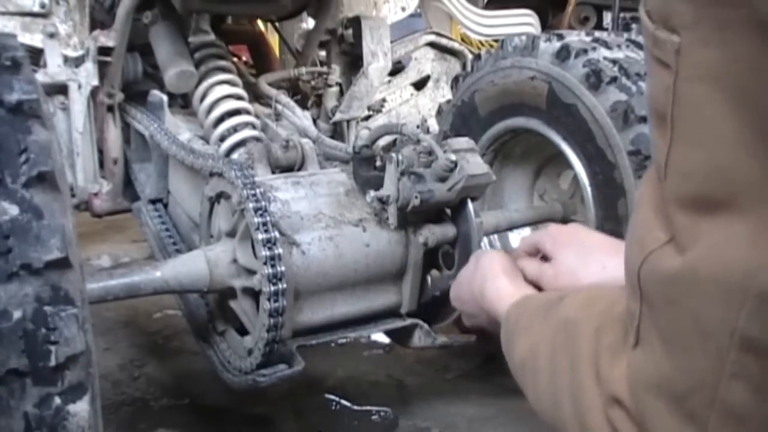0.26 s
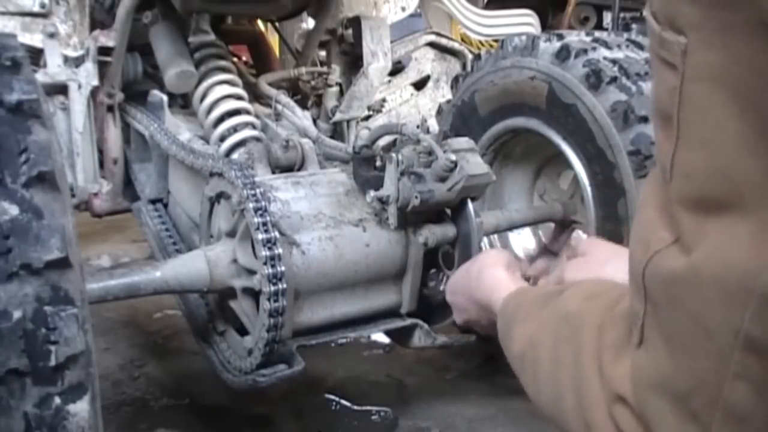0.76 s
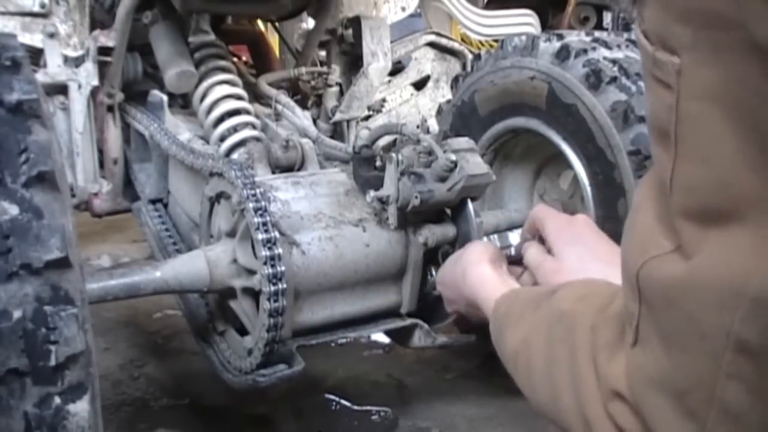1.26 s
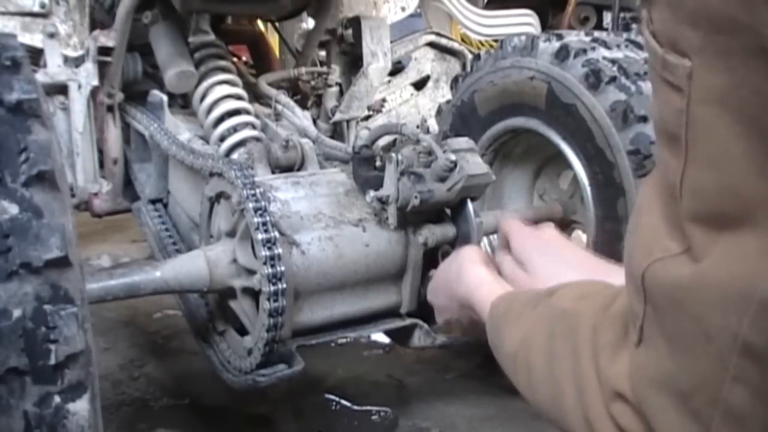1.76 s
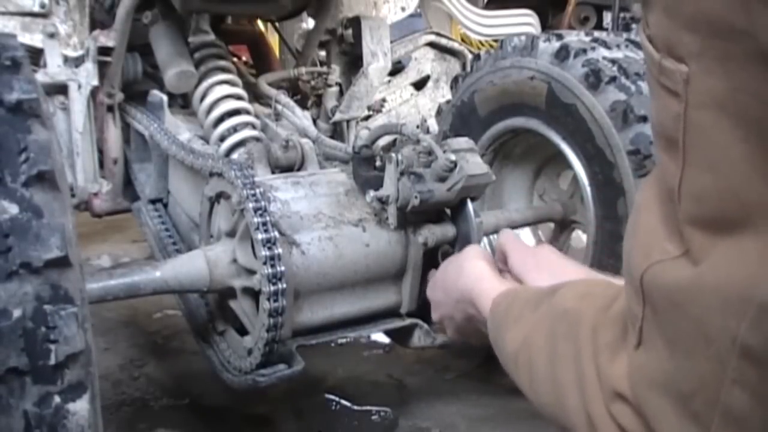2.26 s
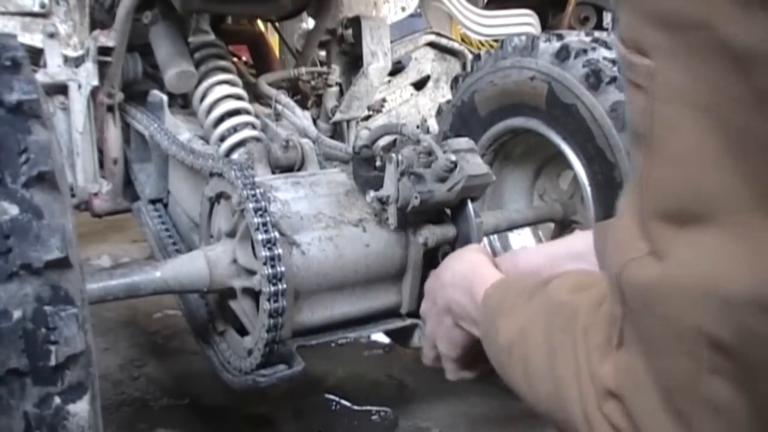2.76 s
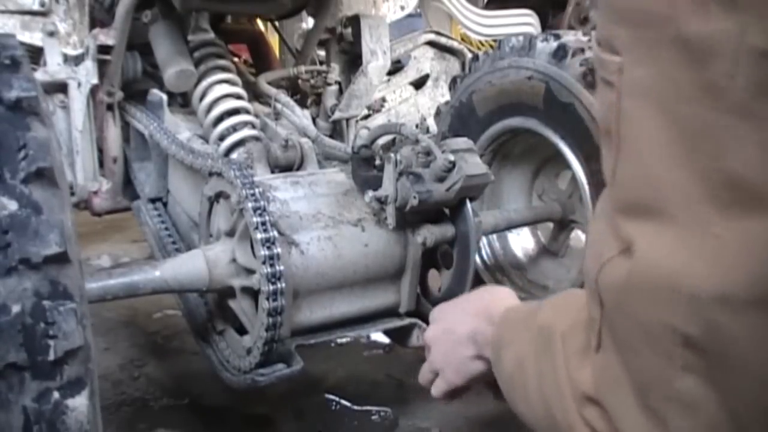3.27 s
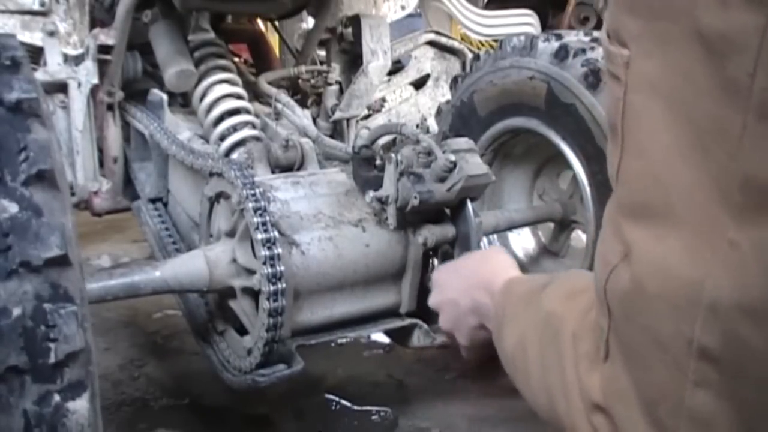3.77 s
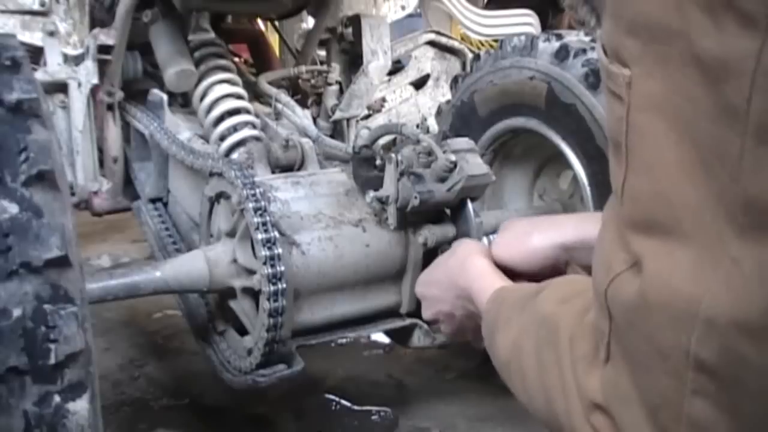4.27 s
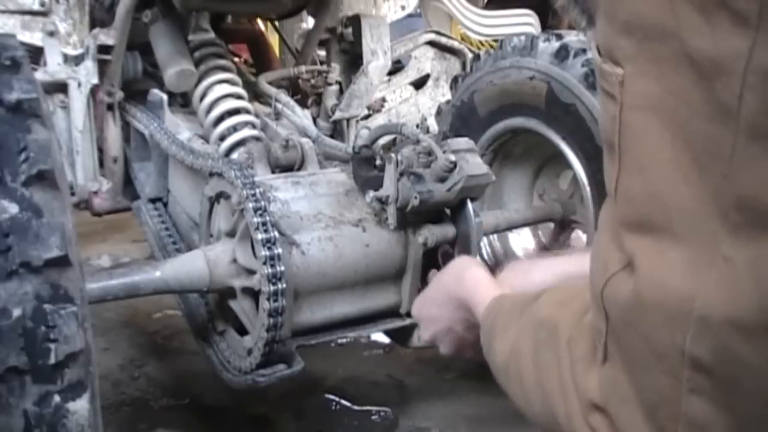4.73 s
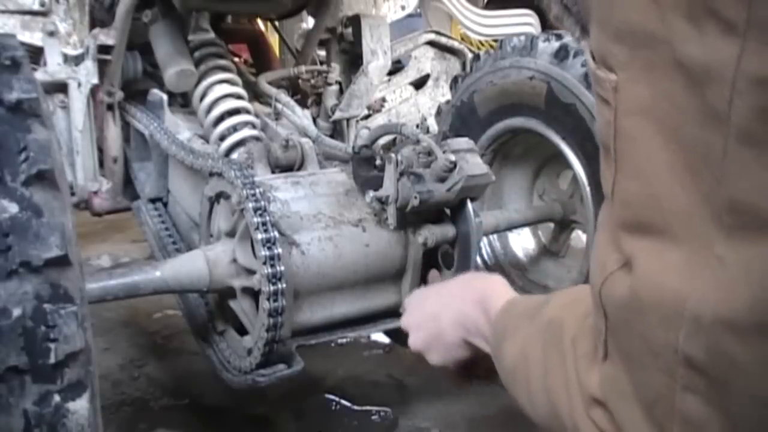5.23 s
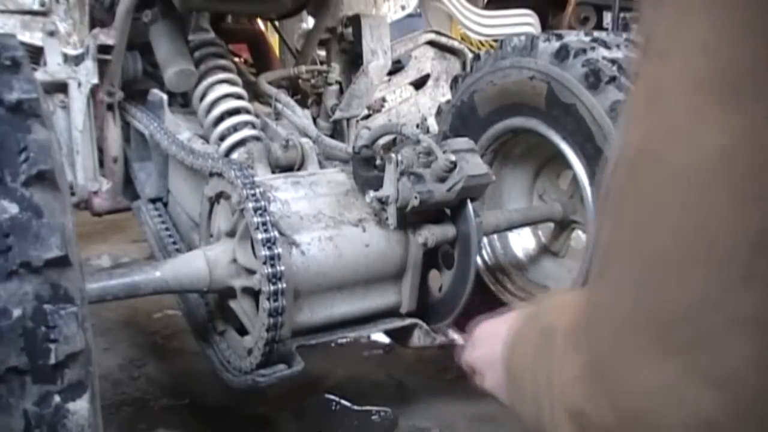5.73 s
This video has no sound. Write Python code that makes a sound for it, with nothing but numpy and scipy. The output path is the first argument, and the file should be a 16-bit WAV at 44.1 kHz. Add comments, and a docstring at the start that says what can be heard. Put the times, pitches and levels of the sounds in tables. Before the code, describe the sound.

A nut is unscrewed by hand from a quad bike's axle. The loose hub gives short, uneven metal knocks, the nut clinks once, and the threads tick and scrape. Midway, something bumps on the floor and a washer jingles lightly. More scrapes and knocks follow, then a tool clacks and heavy overalls rustle. The small workshop adds a short reverberation, with faint hiss and hum underneath.

```python
"""Sleeves rustle over a faint hum and hiss, then a loose hub knocks on its splines: someone is spinning
a nut off the rear axle of a quad bike by hand, in a small workshop. The threads tick and scrape by
stick-slip friction, and small steel parts clink in their free modes. Things bump on the floor and a
tool clacks as the hand takes it. A short reverberation follows every blow."""
import sys
import numpy as np
from scipy import signal
from scipy.fft import rfft, irfft
from scipy.io import wavfile

SR = 44100
rng = np.random.default_rng(int(sys.argv[2]) if len(sys.argv) > 2 else 0)


def file_out(sig):
    """Save sig as 16-bit WAV at sys.argv[1]."""
    # one column per channel
    cols = np.atleast_2d(sig).T
    # limit, then scale
    lim = np.clip(cols, -1, 1)
    pcm = np.round(lim * 32767).astype(np.int16)
    wavfile.write(sys.argv[1], SR, pcm)


N = 264600
T = np.arange(N) / SR
AGE = T[:SR * 3 // 4]  # seconds since a contact began


def undb(db):
    """Decibels to amplitude ratio."""
    return 10 ** (np.asarray(db) / 20)


def unit(x):
    """Scale to rms 1."""
    return x / np.sqrt(np.mean(x ** 2))


def unit_blow(x):
    """Scale a blow to rms 1 over its first 5 ms."""
    return x / np.sqrt(np.mean(x[:SR // 200] ** 2))


def at_hz(points, hz):
    """Interpolate a spectrum on a log-frequency axis."""
    f, value = np.transpose(points)
    return np.interp(np.log(np.maximum(hz, 1)), np.log(f), value)


def coloured(points, size):
    """Filtered noise of rms 1; the points give its relative spectral density."""
    gain = undb(at_hz(points, np.fft.rfftfreq(size, 1 / SR)))
    return unit(irfft(rfft(rng.standard_normal(size)) * gain, size))


def walk(rate_hz, size):
    """Smooth random modulation with spread near 1."""
    knots = rng.standard_normal(size)
    return np.interp(np.arange(size) * rate_hz / SR, np.arange(size), knots)


def shelf(x, db, edge_hz):
    """A shelving filter lifts or lowers everything under the edge."""
    hz = np.fft.rfftfreq(len(x), 1 / SR)
    return irfft(rfft(x) * undb(db / (1 + (hz / edge_hz) ** 6)), len(x))


def add(out, start_s, x):
    """Superpose a sound from start_s on."""
    i = max(int(start_s * SR), 0)
    out[i:i + len(x)] += x[:N - i]


def swells(rows, rest_db):
    """An envelope of smooth arches, one a row, summed in power with a resting level."""
    power = undb(rest_db) ** 2
    for middle_s, length_s, level_db in rows:
        arch = np.cos(np.pi * np.clip((T - middle_s) / length_s, -.5, .5)) ** 2
        power = power + (undb(level_db) * arch) ** 2
    return np.sqrt(power)


def clothes():
    """Friction noise: fibres catch and let go as the fingers work and the body shifts."""
    # friction spectra of fingers and overalls: frequency_hz, level_db
    finger_spectrum = [(100, -41), (250, -23.5), (900, -28), (1600, -2), (2600, -5.5), (4800, -8.5),
                       (7000, -2), (10000, 2), (12500, -1), (14000, -1.5)]
    overall_spectrum = [(45, -37), (80, -27), (110, 0), (163, -8), (220, -8), (414, -10.5), (800, 0.5),
                        (1320, 0.5), (2780, -7), (5000, -10), (9000, -19)]
    # fingers rub cloth and steel, the body shifts in heavy overalls: middle_s, length_s, level_db
    rubs = [(0.02, 0.12, -54.5), (0.6, 0.45, -55), (2.07, 0.16, -47), (2.66, 0.63, -44.5),
            (2.97, 0.56, -44.5), (3.32, 0.44, -44.5), (3.66, 0.52, -49.5), (4.37, 0.4, -51),
            (5.08, 0.28, -45.5), (5.33, 0.54, -51), (5.95, 0.6, -36)]
    shifts = [(2.9, 0.26, -51), (3.65, 0.19, -50), (4.5, 2.35, -56.5), (5.22, 1.1, -56.5),
              (5.54, 0.077, -48), (5.75, 0.62, -50.5), (5.94, 0.28, -37.5)]
    fingers = coloured(finger_spectrum, N) * unit(undb(1.7 * walk(700, N) + 0.22 * walk(35, N)))
    overalls = coloured(overall_spectrum, N) * unit(undb(3.9 * walk(320, N) + 1.6 * walk(40, N)))
    return fingers * swells(rubs, rest_db=-61.5) + overalls * swells(shifts, rest_db=-68.5)


def background():
    """Ambient noise: steady hiss and rumble, with a hum that wavers in phase and amplitude."""
    # hiss of the workshop air: frequency_hz, level_db
    air = [(15, -28), (25, -15), (101, 0), (211, 4), (452, 2), (604, 2), (874, 1.5), (1140, -2.5),
           (1560, -4.5), (2200, -10.5), (3350, -10), (5370, -12.5), (9100, -9.5), (11800, -9), (13500, -26)]
    # the hum swells and sinks: middle_s, length_s, level_db
    hum_swells = [(0.5, 1, -60), (2.0, 0.56, -61), (5.95, 0.9, -63.5)]
    tone = np.sqrt(2) * np.sin(2 * np.pi * 119 * T + 2.6 * walk(9.5, N))
    hum = tone * undb(2.3 * walk(20, N)) * swells(hum_swells, rest_db=-72)
    rumble = coloured([(25, -22), (55, -14), (74, 5.0), (88, -1), (102, -19), (150, -7),
                       (400, -33), (2000, -30)], N)
    return undb(-54.5) * coloured(air, N) + hum + undb(-73) * rumble


def onset(rise_s):
    """A contact builds up over a finite time while the faces settle on each other."""
    return 1 - np.exp(-AGE / rise_s)


def crack(decay_s):
    """A brief impact has a broad spectrum: a burst of noise where two hard faces meet."""
    # contact noise: frequency_hz, level_db
    contact = [(50, -49), (150, -5), (300, 0), (700, -3), (1500, -1), (3500, -2), (5000, -6), (6500, -2),
               (9000, -2.5), (13500, -9.5)]
    return unit_blow(coloured(contact, len(AGE)) * np.exp(-AGE / decay_s) * onset(0.00032))


def chatter(bouts, count=8):
    """Repeated impact: a dangling part touches unevenly, ever more lightly. Gives start_s, level_db."""
    gap_s, jitter, scatter_db, fade_db_per_s = 0.034, 0.25, 1.5, 25
    touches, steps = [], np.arange(count)
    for start_s, length_s, level_db in bouts:
        slip, scatter = rng.standard_normal((count, 2)).T
        ages = gap_s * (steps + jitter * slip * (steps > 0))
        levels = level_db + scatter_db * scatter - fade_db_per_s * ages
        touches += [(start_s + age, db) for age, db in zip(ages, levels) if age < length_s]
    return touches


def chimes(touches, modes, tick_db, tick_s):
    """Mode splitting: a small free steel part is not quite round, so each of its modes beats."""
    out = np.zeros(N)
    hz, db, t60 = np.transpose(modes)[:, :, None]
    for start_s, level_db in touches:
        phase, split = rng.random((2, len(modes), 1))
        beat = 1 + .5 * np.cos(2 * np.pi * 45 * split * AGE)
        decay = np.exp(-np.log(1000) * AGE / t60)
        ring = undb(db) * beat * decay * np.sin(2 * np.pi * (hz * AGE + phase))
        add(out, start_s, undb(level_db) * (unit_blow(ring.sum(axis=0)) + undb(tick_db) * crack(tick_s)))
    # so small a part radiates only treble
    return signal.sosfilt(signal.butter(2, 600, "high", fs=SR, output="sos"), out)


def nut_brushes():
    """Light repeated contact with the axle excites a few high, short-lived modes of the nut."""
    # bouts of brushing: start_s, length_s, level_db
    bouts = [(0.125, 0.02, -52), (0.572, 0.09, -50.5), (1.09, 0.07, -45.5)]
    # modes of the brushed nut: pitch_hz, level_db, t60_s
    modes = [(6420, -4, .09), (9400, -7, .08), (11500, -3, .09), (12650, -2, .08)]
    return chimes(chatter(bouts), modes, tick_db=-2, tick_s=0.016)


def contact_colour(hz, hardness_db, spot_hz, lift_db):
    """Modal excitation in dB: soft contact favours low modes, the struck spot those near one pitch."""
    softness_db = -hardness_db / (1 + (hz / 2000) ** 6)
    return softness_db + lift_db * np.exp(-(np.log2(hz / spot_hz) / .35) ** 2)


def blows(hits, modes, crowd, crowd_db, damp_s, ring_db, ring_s, lift_db, tick_db, tick_s, rise_s):
    """Damped vibration: a held part's modes lose most energy at once, then ring on faintly."""
    out = np.zeros(N)
    hz, width, db = np.transpose(modes)[:, :, None]
    grid_hz = np.geomspace(100, 9000, 60)
    tail = undb(ring_db) * np.exp(-AGE / ring_s)
    fade = np.exp(-AGE / damp_s - np.pi * width * AGE) + tail
    for start_s, level_db, hardness_db, spot_hz in hits:
        touch = (hardness_db, spot_hz, lift_db)
        detune, phase = rng.standard_normal((2, len(modes), 1))
        gain = undb(db + contact_colour(hz, *touch)) * np.sqrt(width)
        tones = np.sin(2 * np.pi * (hz * (1 + 0.0046 * detune) * AGE + phase))
        strong = (gain * fade * tones).sum(axis=0)
        # the crowd of weaker modes overlaps into noise
        spectrum = np.column_stack([grid_hz, at_hz(crowd, grid_hz) + contact_colour(grid_hz, *touch)])
        weak = coloured(spectrum, len(AGE)) * (np.exp(-AGE / (0.7 * damp_s)) + tail)
        body = unit_blow((unit(strong) + undb(crowd_db) * unit(weak)) * onset(rise_s))
        tick = undb(tick_db + 0.16 * hardness_db) * crack(tick_s)  # harder contacts tick more
        add(out, start_s, undb(level_db) * (body + tick))
    # parts this small radiate no bass
    return signal.sosfilt(signal.butter(6, 235, "high", fs=SR, output="sos"), out)


def hub_knocks():
    """Impact excitation: the loose hub strikes the axle's splines and sounds its damped modes."""
    # knocks: start_s, level_db, hardness_db, spot_pitch_hz
    hits = [(0.136, -43.5, -15, 740), (0.299, -15, -7.5, 1420), (0.342, -29.5, 9, 2200),
            (0.499, -35, -7, 1820), (1.075, -32, -15.5, 760), (1.118, -27.5, -19, 1070),
            (1.141, -26, -26, 1430), (1.506, -18.5, -11, 1510), (1.538, -28, -2, 2430),
            (1.79, -37.5, -15, 895), (2.106, -29, -20.5, 1500), (2.237, -30, -14, 1020),
            (2.358, -12, 0.5, 1540), (4.281, -23.5, -9.5, 3130), (4.706, -25, -17.5, 700)]
    # hub resonances: pitch_hz, width_hz, level_db
    modes = [(300, 20, -11.5), (651, 56, -2), (735, 32, 3), (880, 75, -5), (1076, 12, -4.5), (1122, 8.5, 4),
             (1316, 58, -2.5), (1367, 130, 1), (1470, 82, 1), (1615, 180, 4), (2000, 39, 0), (2328, 140, 7),
             (2560, 95, 1.5), (2860, 28, -3), (2803, 36, 8.5), (3300, 41, -8), (3450, 71, 5), (4110, 49, 0),
             (3920, 110, -3)]
    # weaker modes between them: frequency_hz, level_db
    crowd = [(100, -32), (200, -22), (290, -18), (480, -25), (620, -4), (750, -1.5), (1400, -7), (1800, -4),
             (2700, 0.5), (4200, -4), (5200, -24), (9000, -69)]
    return blows(hits, modes, crowd, crowd_db=-3.5, damp_s=0.0083, ring_db=-40, ring_s=0.069,
                 lift_db=5.5, tick_db=-7.5, tick_s=0.0034, rise_s=0.0014)


def grit(body_db, ring_share, rough_db, grain_hz):
    """Roughness noise: tiny slips of steel, filtered by the resonances of nut and thread."""
    # friction spectrum of the thread: frequency_hz, level_db
    thread = [(100, -51), (300, -17), (750, -6), (1900, -9), (2800, -7.5), (4300, -9.5), (5600, -9),
              (6800, -7.5), (7900, -4), (8700, -2), (10000, -4), (11500, -3), (13500, -7)]
    # resonances of the nut held in the fingers: pitch_hz, width_hz, level_db
    held_nut = [(2860, 400, 12), (5500, 380, 9), (6550, 220, 6), (7870, 290, 14), (9000, 300, 8),
                (11100, 320, 9), (12220, 280, 8)]
    size = len(AGE)
    hz = np.fft.rfftfreq(size, 1 / SR)
    slips = shelf(coloured(thread, size), body_db, 4240) * unit(undb(rough_db * walk(grain_hz, size)))
    centre, width, db = np.transpose(held_nut)[:, :, None]
    grip = 1 + 0.025 * rng.standard_normal((len(held_nut), 1))  # each grip shifts the resonances
    peaks_db = (db / (1 + (2 * (hz - centre * grip) / width) ** 2)).sum(axis=0)
    return irfft(rfft(slips) * undb(np.clip(ring_share, 0, 1) * (peaks_db - 6)), size)


def thread_ticks():
    """Stick-slip: the nut catches and jumps; when loose it rings more, falls back and ticks again."""
    # jumps on the thread: start_s, level_db, looseness (0-1)
    ticks = [(0.34, -29.5, 0.03), (1.496, -28, 0), (1.6242, -33.5, 0), (1.6704, -34, 0.77),
             (1.791, -37.5, 0.46), (1.8536, -32.5, 0.86), (1.9095, -26, 0.9), (1.946, -27.5, .55),
             (2.0084, -32.5, 0.45), (2.104, -38, .1), (2.3203, -29, 0.45), (2.5648, -25, 0.2),
             (3.016, -25.5, 0), (3.608, -43.5, 0.3), (4.1677, -33.5, 0.75), (4.228, -42, 0),
             (4.5452, -37, 0.55), (4.77, -33.5, 0.1), (5.3368, -25.5, 0.27)]
    rebound_s, rebound_db = 0.016, -3.5  # for a fully loose nut
    out = np.zeros(N)
    for start_s, level_db, looseness in ticks:
        decay_s = np.interp(looseness, [0, 1], [0.0042, 0.0094])
        ring_share = np.interp(looseness, [0, 1], [0.41, 1])
        envelope = np.exp(-AGE / decay_s) * onset(0.0021)
        for delay_s, gain in [(0, 1), (rebound_s, undb(rebound_db) * looseness ** 2)]:
            tick = envelope * grit(body_db=-3.5, ring_share=ring_share, rough_db=5.0, grain_hz=1560)
            add(out, start_s + delay_s - .001, gain * undb(level_db) * unit_blow(tick))
    return out


def nut_clink():
    """Free vibration: the struck nut rings in its inharmonic modes."""
    # the strike: start_s, level_db
    touches = [(0.708, -27.5)]
    # modes of the free nut: pitch_hz, level_db, t60_s
    modes = [(2013, -12, .3), (2449, -7, .38), (3252, -4, .36), (3690, -9, .3), (4479, -6, .27),
             (5163, -12, .2), (5728, 1, .22), (5835, -1, .36), (6535, -3, .34), (7267, -5, .16),
             (7354, -2, .13), (10261, -9, .2), (10567, -2, .19), (11488, -6, .22), (12344, -1, .18)]
    return chimes(touches, modes, tick_db=6.0, tick_s=0.0063)


def washer_jingles():
    """Repeated impacts excite a washer's free modes, and the overlapping decays make a jingle."""
    # bouts of jingling: start_s, length_s, level_db
    bouts = [(1.41, 0.085, -52.5), (3.153, 0.17, -39.5), (3.444, 0.02, -48.5), (3.72, 0.05, -49),
             (3.924, 0.02, -52)]
    # washer modes: pitch_hz, level_db, t60_s
    modes = [(3450, -13, .3), (4452, -8, .3), (5163, -11, .15), (5739, -4, .28), (6562, -11, .25),
             (7192, -1, .3), (8403, -2, .22), (8495, -4, .2), (8764, 0, .2), (9157, -6, .15),
             (10148, -3, .25), (10449, -6, .2), (11590, -9, .2), (11956, -9, .2), (12306, -1, .22)]
    return chimes(chatter(bouts), modes, tick_db=-3, tick_s=0.0041)


def thread_scrapes():
    """Sliding friction: steel moves over steel in short gritty strokes."""
    # strokes: start_s, length_s, level_db, ring_share (0-1)
    scrapes = [(1.886, 0.13, -40, 1), (2.138, 0.076, -36.5, 0.8), (2.219, 0.048, -27, 0.45),
               (2.33, 0.057, -36, 0), (3.473, 0.056, -39.5, 0), (3.533, 0.056, -27, 0.27),
               (3.601, 0.022, -24, 0.2), (4.552, 0.09, -50.5, 0.4), (4.719, 0.051, -46, 0.1),
               (5.109, 0.091, -41.5, .1), (5.261, 0.024, -33.5, 0), (5.291, 0.023, -39, 0)]
    out = np.zeros(N)
    for start_s, length_s, level_db, ring_share in scrapes:
        stroke = np.sqrt(np.abs(np.sin(np.pi * np.minimum(AGE / length_s, 1))))
        friction = grit(body_db=4.5, ring_share=ring_share, rough_db=2.5, grain_hz=1200)
        add(out, start_s, undb(level_db) * stroke * friction)
    return out


def floor_bumps():
    """Heavily damped impacts: things are put down on the floor and barely ring."""
    # bumps: start_s, level_db, hardness_db, spot_pitch_hz
    hits = [(2.847, -45, -13, 300), (3.059, -12.5, 1, 666), (3.486, -36.5, -20, 610), (3.88, -43, -33, 730),
            (5.512, -33.5, -27, 484)]
    # resonances of things on the floor: pitch_hz, width_hz, level_db
    modes = [(301, 17, 1.5), (606, 160, -10), (700, 46, -13), (1032, 13, 5), (1340, 92, 6.5),
             (1570, 380, 7), (2004, 100, 8.5), (1960, 130, -34), (2380, 63, 3), (2280, 31, -17),
             (2760, 170, -1), (3380, 140, -9), (3620, 49, -21)]
    # weaker modes between them: frequency_hz, level_db
    crowd = [(100, -35), (200, -43), (290, -16), (420, -2.5), (650, -3), (1250, 4), (1650, -36),
             (2200, -9.5), (3200, -9), (5000, -25), (9000, -43)]
    return blows(hits, modes, crowd, crowd_db=-2.5, damp_s=0.011, ring_db=-42, ring_s=0.018,
                 lift_db=8.5, tick_db=-12.5, tick_s=0.002, rise_s=0.00086)


def tool_clack():
    """A damped transient: a tool clacks as the hand takes it, and its modes die quickly."""
    # the clack: start_s, level_db, hardness_db, spot_pitch_hz
    hits = [(5.641, -17.5, -0.5, 1070)]
    # tool resonances: pitch_hz, width_hz, level_db
    modes = [(308, 32, -24), (450, 19, -8.5), (686, 55, -14), (915, 44, -3), (995, 58, -0.5),
             (1140, 45, -18), (1250, 88, -1), (1630, 36, -10), (2030, 87, 1), (2760, 90, -13),
             (3060, 49, -17), (3600, 120, -19), (4200, 50, -26), (4300, 50, -14)]
    # weaker modes between them: frequency_hz, level_db
    crowd = [(100, -38), (210, -31), (300, -3.5), (450, -17), (600, -1), (900, -15), (1150, 7), (1600, -11),
             (2100, -9), (3300, -9), (5000, -20), (9000, -44)]
    return blows(hits, modes, crowd, crowd_db=-5, damp_s=0.0086, ring_db=-48, ring_s=.025,
                 lift_db=2.3, tick_db=-13.5, tick_s=0.0055, rise_s=0.0017)


def workshop(dry, ring_s, damping_hz=9000, build_s=0.0025):
    """Reverberation: floor, walls and machine add dense reflections that die sooner in the treble."""
    # reverberant against direct sound: frequency_hz, level_db
    room = [(150, -7), (350, 0.5), (520, 0.5), (750, 1), (1400, -5), (3000, -5.5), (5500, -7), (12000, -10)]
    hz = np.fft.rfftfreq(len(AGE), 1 / SR)
    scatter = rfft(rng.standard_normal(len(AGE)))
    edges = np.geomspace(100, 16000, 23)
    response = np.zeros(len(AGE))
    for low, high in zip(edges[:-1], edges[1:]):
        centre = np.sqrt(low * high)
        t60 = ring_s / (1 + centre / damping_hz)
        band = irfft(scatter * ((hz >= low) & (hz < high)), len(AGE))
        band *= np.exp(-np.log(1000) * AGE / t60) * (1 - np.exp(-(AGE / build_s) ** 2))
        band *= np.sqrt(2 * (high - low) / SR / np.sum(band ** 2))  # unit gain within the band
        response += band * undb(at_hz(room, centre))
    return dry + signal.fftconvolve(dry, response)[:N]


def scene():
    """Superposition in one room; each group of sources has its own reverberation time, and blows on the floor
    die soonest."""
    hub, bumps, tool = hub_knocks(), floor_bumps(), tool_clack()
    on_axle = workshop(hub, ring_s=0.53)
    on_floor = workshop(bumps + tool, ring_s=0.47)
    air = background()
    handling = thread_ticks() + thread_scrapes() + clothes()
    small_parts = nut_clink() + nut_brushes() + washer_jingles()
    in_hand = workshop(small_parts + handling, ring_s=0.56)
    return (on_axle + on_floor + in_hand + air)[None]


def record(dry):
    """Soft saturation rounds the loudest peaks, and a steep low-pass cuts the top of the treble."""
    return signal.sosfilt(signal.ellip(10, .2, 75, 13550, fs=SR, output="sos"), np.tanh(dry))


dry = scene()
out = record(dry)
file_out(out)
```